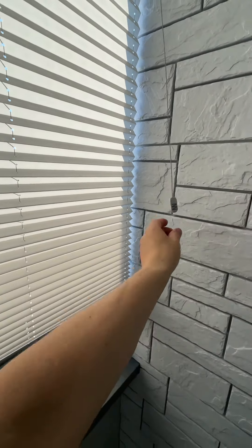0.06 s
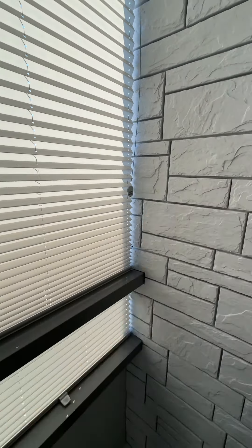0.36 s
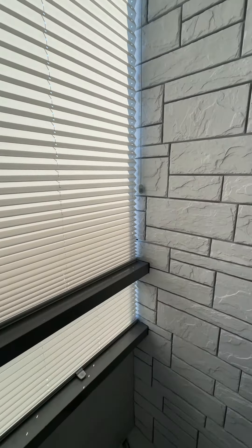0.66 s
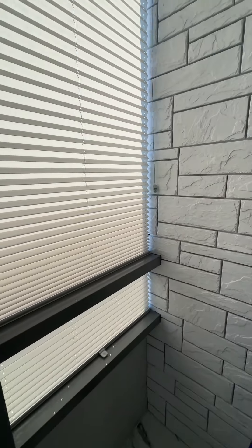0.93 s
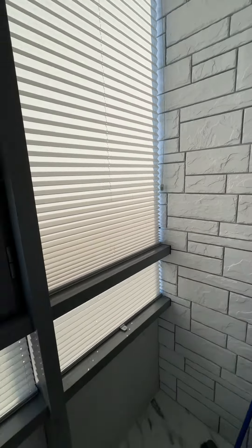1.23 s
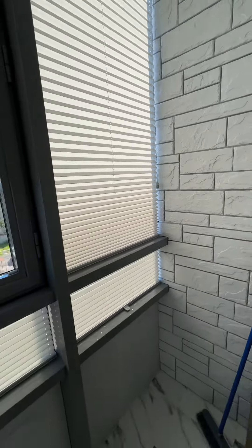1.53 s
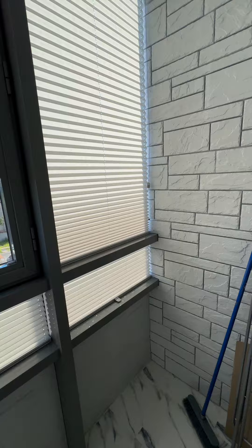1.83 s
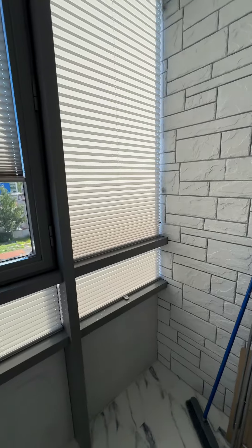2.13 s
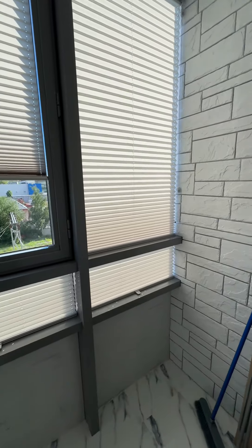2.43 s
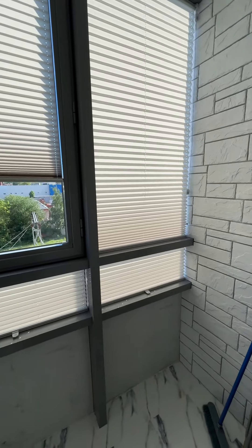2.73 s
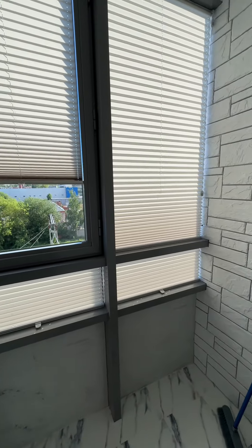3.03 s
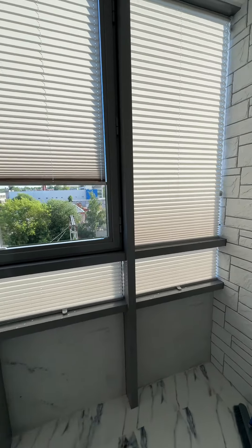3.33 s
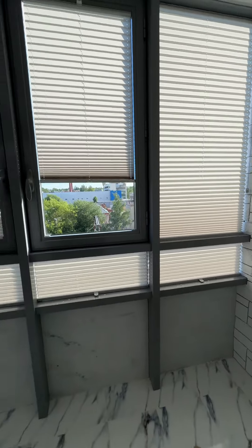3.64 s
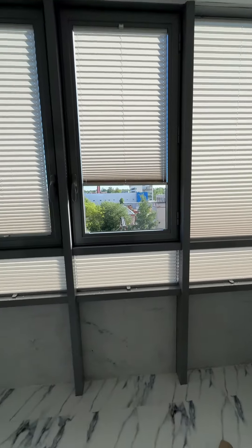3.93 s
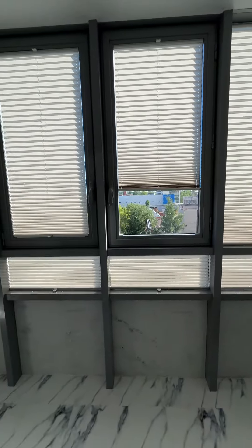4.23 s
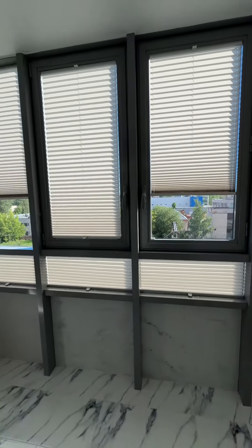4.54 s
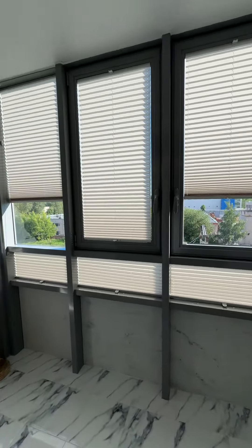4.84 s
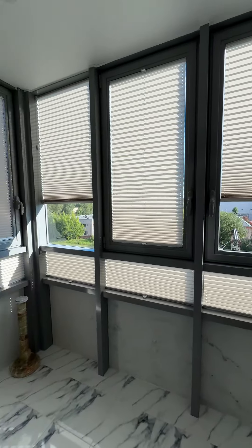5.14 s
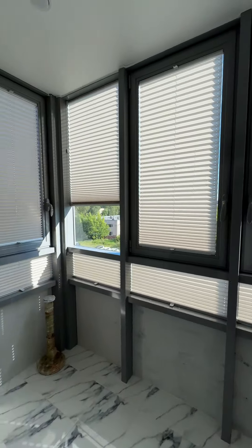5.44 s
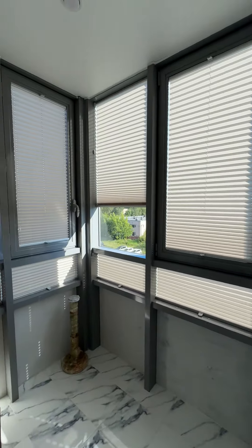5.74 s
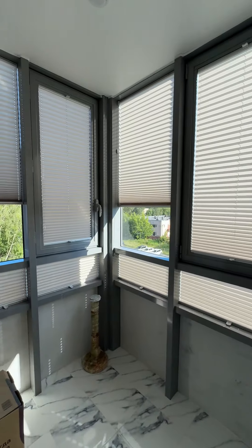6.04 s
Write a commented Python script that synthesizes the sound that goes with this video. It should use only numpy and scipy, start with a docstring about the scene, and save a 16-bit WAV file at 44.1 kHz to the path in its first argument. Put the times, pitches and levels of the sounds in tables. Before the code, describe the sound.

Someone moves around a narrow enclosed balcony, heard from close by over a faint low rumble from outside. After a brief rub and squeak, the handle of a window blind clacks against the wall with a quick bounce. Clothes rustle and feet shuffle in uneven bursts, mixed with blunt knocks and light ticks. A drawn-out rasping slide follows, then a short cluster of knocks, and the last rustles grow faint.

```python
"""Clothing rustles and feet shuffle on a small tiled balcony, while a low hum comes through the glass.
First comes a rub and a thin squeak, and at 0.4 s a handle taps the wall and bounces.
Short rushes of rubbing cloth follow, with small ticks, dull knocks and soft thuds as someone moves.
From 3.4 to 4.2 s there is one long, rasping slide. A few more knocks come near 4.7 s,
then the last rustles grow faint and the background sinks."""
import sys
import numpy as np
from scipy import signal
from scipy.fft import rfft, irfft, next_fast_len
from scipy.io import wavfile
from scipy.ndimage import uniform_filter1d

SR = 44100
rng = np.random.default_rng(int(sys.argv[2]) if len(sys.argv) > 2 else 0)


def pcm_store(signal):
    """Save signal as 16-bit PCM."""
    levels = np.round(np.clip(np.atleast_2d(signal), -1, 1) * 32767)
    wavfile.write(sys.argv[1], SR, levels.astype(np.int16).T)


N = 272962
TIME = np.arange(N) / SR
AGE = TIME[:SR // 2]   # seconds since one short sound began

# How long the balcony rings (a fade is the time to drop 60 dB): pitch_hz, fade_s
ROOM_FADES = [(125, 0.38), (500, 0.25), (2000, 0.26), (6000, 0.24), (14000, 0.23)]
# Standing waves between floor, ceiling and walls: pitch_hz, width_hz, boost_db
ROOM_RESONANCES = [(113, 14.7, 6), (124.6, 3.3, 5), (173.6, 11, -0.5), (211, 6.5, 2.5)]
# The slowly sinking background, before its offsets are added: time_s, hum_db, rumble_db
OUTSIDE_LEVELS = [(0.0, -64, -61.5), (2.9, -74, -58.5), (4.8, -76, -66), (5.4, -76, -69.5)]
# Tone of the distant rumble: pitch_hz, gain_db
RUMBLE_TONE = [(30, -37), (70, -8), (100, -3), (170, 0.5), (250, -9.5), (500, -14), (1000, -15),
               (2500, -19.5), (8000, -30)]
# Tone of the faint, steady air noise: pitch_hz, gain_db
AIR_TONE = [(40, -19), (90, 10.5), (150, 10), (300, 9.5), (500, 2), (900, -24), (1300, -2), (1700, 6.5),
            (2400, -24), (4000, -28), (8000, -28), (15500, -25)]

# Soft, heavy thuds: start_s, level_db, drag_s
THUD_EVENTS = [(0.01, -54.5, 0.04), (1.647, -43.5, 0.081), (1.704, -41, 0.034), (3.617, -38.5, 0.021),
               (3.647, -37.5, 0.031), (3.701, -45, 0.056), (4.811, -54.5, 0.053), (4.98, -53.5, 0.067),
               (6.06, -62.5, .05)]
# Tone of a thud: pitch_hz, gain_db
THUD_TONE = [(40, -68), (75, -6), (110, 0), (150, 3.5), (230, -1), (330, -6.5), (500, -24.5), (1200, -55),
             (4000, -66)]
# Small ticks and scrapes of someone moving: start_s, level_db, drag_s, tilt_db_per_octave
TICK_EVENTS = [(0.1428, -47.5, 0.0044, 9), (0.156, -44.5, .008, 13), (1.267, -44.5, 0.018, 8),
               (1.28, -39, 0.009, 4.5), (2.041, -47.5, 0.0046, 1.5), (2.152, -54, 0.0052, 5.5),
               (2.402, -55.5, 0.018, 6), (3.4252, -44.5, 0.0045, 1), (4.172, -39, 0.006, -1.5),
               (4.9107, -66, 0.012, 4.5), (5.7658, -63.5, 0.00091, -4)]
# Tone of a tick: pitch_hz, gain_db
TICK_TONE = [(50, -40), (150, 0), (400, 8), (1050, 8), (1700, 7), (3000, 3.5), (5000, 1), (8000, -5.5),
             (11000, -7.5), (16000, -16.5)]
# Dull knocks: start_s, level_db, muffle_hz, tilt_db_per_octave, room_db
KNOCK_EVENTS = [(0.7377, -37.5, 1070, 0.5, 5), (0.7464, -44.5, 620, 2, -2), (1.2681, -36, 1840, 2, 5),
                (1.285, -30, 1760, 1.5, -1), (1.29, -28, 1680, 1, 0), (1.308, -34, 900, -2.5, 1.5),
                (2.129, -51, 930, 3.5, 8), (2.4, -53, 900, -3, 5), (3.2141, -39, 990, -1, 4.5),
                (3.241, -47.5, 400, -16.5, -3), (4.668, -35.5, 1600, -0.5, -0.5),
                (4.687, -42.5, 1090, 5, 0), (4.7034, -34, 1510, 0, 2), (6.057, -56.5, 1250, 11, 7)]
# Tone of a knock: pitch_hz, gain_db
KNOCK_TONE = [(60, -26), (130, -5.5), (230, -1), (400, -4), (800, 0), (1100, -4), (2200, -6), (5000, -7.5),
              (16000, -13)]
# Where the knocked surface rings: pitch_hz, width_hz, boost_db
PANEL_RESONANCES = [(334, 38, 9), (465, 220, 10), (757, 110, 3), (1590, 220, 7.5)]
# A handle taps the wall and bounces: start_s, level_db, tilt_db_per_octave, room_db
TAP_EVENTS = [(0.4087, -31, -2, -3), (0.4119, -34, 1.5, 0.5), (0.441, -37, 5.5, 2.5), (0.449, -40.5, 2, 0),
              (0.455, -41.5, -4, 0)]
# Tone of a tap: pitch_hz, gain_db
TAP_TONE = [(60, -51), (300, -2), (700, -9), (1300, 0.5), (3000, -8.5), (6000, -11), (7000, -22),
            (9000, -23), (16000, -27)]
# Where the handle rings: pitch_hz, width_hz, boost_db
HANDLE_RESONANCES = [(448, 125, 20), (1345, 130, 6.5), (1650, 140, 7), (1800, 120, 5.5), (2180, 490, 18.5),
                     (3600, 440, -1), (5500, 900, 0.5), (7500, 450, 6)]
# Squeaks and rasps of things rubbing: peak_s, level_db, pitch_hz, width_hz, half_length_s
SQUEAK_EVENTS = [(0.01, -47, 8880, 300, 0.006), (0.046, -47, 8800, 248, 0.022),
                 (0.447, -43.5, 5630, 1110, 0.0077), (0.457, -47, 3600, 2180, .008),
                 (0.664, -62.5, 4050, 406, 0.0041), (0.683, -63, 4180, 403, 0.0035),
                 (1.636, -42.5, 2460, 1110, .004), (1.664, -43.5, 1264, 490, .02),
                 (1.768, -38.5, 1800, 1089, 0.021), (2.078, -52.5, 987, 602, 0.036),
                 (2.472, -44.5, 3310, 1805, 0.018), (2.597, -43.5, 2485, 1036, 0.0096),
                 (2.846, -43.5, 379.6, 216, .022), (3.002, -49.5, 1025, 90, .025),
                 (3.528, -49, 3005, 1503, 0.087), (3.8, -53, 6200, 1800, 0.053),
                 (3.906, -44.5, 450, 221, 0.038), (4.135, -40.5, 830, 88, 0.023),
                 (4.152, -41, 2458, 599, 0.048), (5.006, -52.5, 338, 158, 0.035),
                 (5.017, -67, 5400, 1800, 0.035), (5.28, -68, 1940, 804, 0.041)]

# The fabric's low part, its body: pitch_hz, gain_db
BODY_TONE = [(40, -49), (80, -22), (130, -28.5), (220, -1.5), (330, -1), (480, -5.5), (620, 2), (850, 1),
             (1100, -0.5), (1400, -5.5), (2400, -47)]
# The fabric's middle part, its rub: pitch_hz, gain_db
RUB_TONE = [(600, -26.5), (1000, -8), (1300, -2.5), (2200, 1.5), (2900, -3.5), (4000, -4), (5000, -11.5),
            (8000, -40)]
# The fabric's high part, its sheen: pitch_hz, gain_db
SHEEN_TONE = [(2500, -37), (4000, -6), (5000, 0.5), (7000, 0), (8500, -1.5), (10500, -2), (13000, -8),
              (16000, -10.5)]
# Where the rubbing cloth rings: pitch_hz, width_hz, boost_db
RUSTLE_RESONANCES = [(330, 9.8, 4.5), (485, 91, 7.5), (830, 320, -1), (1053, 75, 2), (1534, 160, 3.5),
                     (2230, 91, 2.5)]
# Short strokes of fabric: start_s, rise_s, hold_s, fade_s, base_db, body_offset_db, sheen_offset_db
STROKE_EVENTS = [ (0.0, 0.0063, 0.082, 0.4, -51, 0.5, -2.5), (0.253, 0.044, 0.0079, 1, -62, -19.5, 2.5),
                 (0.809, 0.015, .02, 0.69, -69.5, 1, 3), (0.876, 0.031, 0.018, 1, -59, 3.5, -3),
                 (1.134, 0.073, .012, 0.31, -48, -1, -1), (1.235, 0.039, 0.059, 0.4, -48.5, 3.5, -3.5),
                 (1.639, 0.013, 0.11, 0.4, -39.5, -3, -15), (1.676, 0.015, 0.02, 0.22, -45, -14, 0.5),
                 (1.927, 0.013, 0.46, 0.83, -73, 7, -3), (2.452, 0.0068, 0.11, 0.3, -53, -9.5, -1.5),
                 (2.585, 0.0073, 0.018, 0.4, -49, -2.5, 0.5), (2.734, 0.086, 0.028, 0.3, -44.5, -1, -5.5),
                 (2.916, 0.032, .02, 0.23, -54, -2.5, -7), (2.9746, 0.0038, 0.024, 0.33, -50, 1.5, -6.5),
                 (3.1466, 0.0044, 0.0096, 0.16, -63, -4, 0), (3.192, 0.0045, 0.072, 0.2, -54, 3.5, -4),
                 (3.3144, 0.011, 0.045, .3, -55.5, -6, -7.5), (3.3717, 0.007, 0.041, 0.15, -50, -3, -6),
                 (4.352, 0.012, 0.024, 0.66, -66.5, -2, 1), (4.497, 0.016, 0.025, 0.34, -70.5, 3, -12),
                 (4.653, 0.032, 0.028, 0.29, -61, -6, -3), (4.961, 0.018, 0.064, 0.22, -63, 4, -5),
                 (5.211, .04, 0.041, 0.28, -77, 6.5, -3), (5.489, 0.027, 0.16, .6, -86.5, 5, -0.5), ]
# The course of the one long slide: time_s, base_db, body_offset_db, sheen_offset_db
SLIDE_LEVELS = [(3.4, -41.5, -8.5, -13), (3.448, -44.5, -6, -9.5), (3.524, -44.5, -16, -16.5),
                (3.672, -44, 0.5, -6), (3.83, -41.5, -0.5, -8), (3.918, -40.5, 1, -10),
                (3.958, -43.5, -2.5, -11), (4.138, -42.5, -1, -9), (4.18, -38.5, -5.5, -10),
                (4.185, -43, 0.5, -10.5)]


def from_db(db):
    """Turn decibels into a number to multiply by."""
    return 10 ** (np.asarray(db) / 20)


def unit_power(x):
    """Scale a signal so that its average power is 1."""
    return x / np.sqrt(np.mean(x ** 2) + 1e-20)


def at_level(x, db):
    """Scale a short sound so that its loudest 8 ms have this level."""
    return x * from_db(db) / np.sqrt(uniform_filter1d(x ** 2, size=SR // 125).max())


def add(out, start_s, sound):
    """Mix a sound into the scene at its start time."""
    i = max(round(start_s * SR), 0)
    out[i:i + len(sound)] += sound[:N - i]


def at_hz(table, hz):
    """Read between the rows of a table, on a musical (log) pitch scale."""
    pitches, values = np.transpose(table)
    return np.interp(np.log(hz + 1), np.log(pitches), values)


def peaks(resonances, hz):
    """The boost in dB near the pitches where something rings."""
    return sum(db / (1 + (2 * (hz - pitch) / width) ** 2) for pitch, width, db in resonances)


def tilt(hz, db_per_octave):
    """A slope in dB that pivots at 2 kHz: upward is brighter, downward is duller."""
    return db_per_octave * np.log2(np.maximum(hz, 100) / 2000)


def shape_tone(x, db_at):
    """Filter x by db_at(hz) decibels, ringing only after each sound (minimum phase)."""
    size = 2 * next_fast_len(len(x) // 2 + 2048)
    log_gain = np.log(from_db(db_at(abs(np.fft.fftfreq(size, 1 / SR)))))
    response = np.exp(np.conj(signal.hilbert(log_gain)))[:size // 2 + 1]
    return irfft(rfft(x, size) * response, size)[:len(x)]


def drift(turns_per_s, size):
    """A random wandering curve, with a typical size of 1."""
    position = np.arange(size) / SR * turns_per_s
    points = rng.standard_normal(int(position[-1]) + 2)
    return unit_power(np.interp(position, np.arange(len(points)), points))


def wavering_tone(hz, width_hz, size=N):
    """A tone whose strength and pitch wander; a wider one sounds rougher."""
    wander = drift(width_hz, size) + 1j * drift(width_hz, size)
    return unit_power(np.real(wander * np.exp(2j * np.pi * hz * TIME[:size])))


def slips(drag_s, first_slip=11.0):
    """Two things touch: one hard slip, then a dying shower of smaller ones."""
    shower = rng.standard_normal(len(AGE)) * rng.exponential(1, len(AGE))
    return shower * np.exp(-AGE / drag_s) + first_slip * (AGE == 0)


def balcony(x, room_db, build_s=0.0012, early_boost=0.72, early_s=0.0085):
    """Add strong early echoes off glass and tile, then a fading tail; new for every position."""
    spectrum = rfft(rng.standard_normal(len(AGE)))
    hz = np.fft.rfftfreq(len(AGE), 1 / SR)
    pitches, fades = np.transpose(ROOM_FADES)
    tail = 0
    for fade_s, share in zip(fades, np.eye(len(fades))):
        band = at_hz(np.c_[pitches, share], hz)
        tail = tail + irfft(spectrum * band, len(AGE)) * from_db(-60 * AGE / fade_s)
    tail *= 1 - np.exp(-(AGE / build_s) ** 2)
    tail *= 1 + early_boost * np.exp(-AGE / early_s)
    echoes = signal.fftconvolve(x, tail / np.linalg.norm(tail))[:len(x)]
    return x + from_db(room_db) * echoes


def room_noise(tone):
    """Steady noise, boosted by the balcony's standing waves."""
    noise = rng.standard_normal(N)
    return unit_power(shape_tone(noise, lambda hz: at_hz(tone, hz) + peaks(ROOM_RESONANCES, hz)))


def background(hum_offset_db=3.5, rumble_offset_db=-3.0, air_db=-74):
    """A wavering hum and distant rumble behind the glass, with faint air noise."""
    times, hum_db, rumble_db = np.transpose(OUTSIDE_LEVELS)
    hum = from_db(np.interp(TIME, times, hum_db) + hum_offset_db) * wavering_tone(hz=59.2, width_hz=14)
    rumble = from_db(np.interp(TIME, times, rumble_db) + rumble_offset_db) * room_noise(RUMBLE_TONE)
    return hum + rumble + from_db(air_db) * room_noise(AIR_TONE)


def thuds():
    """Slow, heavy bumps boom in the narrow room."""
    out = np.zeros(N)
    for start_s, db, drag_s in THUD_EVENTS:
        boom = shape_tone(slips(drag_s), lambda hz: at_hz(THUD_TONE, hz) + peaks(ROOM_RESONANCES, hz))
        add(out, start_s, at_level(balcony(boom, room_db=-2), db))
    return out


def small_ticks():
    """Someone moving makes small, bright ticks; some drag out into a short scrape."""
    out = np.zeros(N)
    for start_s, db, drag_s, slope in TICK_EVENTS:
        tick = shape_tone(slips(drag_s), lambda hz: at_hz(TICK_TONE, hz) + tilt(hz, slope))
        add(out, start_s, at_level(balcony(tick, room_db=4), db))
    return out


def knocks(leak_db=-31):
    """Blunt blows: the softer the contact, the more of the treble is muffled."""
    out = np.zeros(N)
    for start_s, db, muffle_hz, slope, room_db in KNOCK_EVENTS:
        def tone_db(hz):
            surface = at_hz(KNOCK_TONE, hz) + peaks(PANEL_RESONANCES, hz)
            muffling = 10 * np.log10(1 / (1 + (hz / muffle_hz) ** 8) + from_db(leak_db) ** 2)
            return surface + muffling + tilt(np.minimum(hz, muffle_hz), slope)
        blow = shape_tone(1.0 * (AGE == 0), tone_db)   # a single click, shaped into a knock
        add(out, start_s, at_level(balcony(blow, room_db), db))
    return out


def handle_taps():
    """Each tap on the wall briefly rings the handle at the same pitches; glancing ones are brighter."""
    out = np.zeros(N)
    for start_s, db, slope, room_db in TAP_EVENTS:
        def tone_db(hz):
            return at_hz(TAP_TONE, hz) + peaks(HANDLE_RESONANCES, hz) + tilt(np.minimum(hz, 6000), slope)
        clack = shape_tone(1.0 * (AGE == 0), tone_db)
        add(out, start_s, at_level(balcony(clack, room_db), db))
    return out


def squeaks():
    """Something rubbing sings at one pitch, swells and lets go."""
    out = np.zeros(N)
    for peak_s, db, hz, width_hz, half_s in SQUEAK_EVENTS:
        swell = np.exp(-(AGE / half_s - 2) ** 2)
        squeak = swell * wavering_tone(hz, width_hz, len(AGE))
        add(out, peak_s - 2 * half_s, at_level(balcony(squeak, room_db=-8), db))
    return out


def friction(size, rough_db=1.5, judder_db=0.4, snags_per_s=90, snag_db=14):
    """Countless fibres slip in uneven clumps as cloth rubs and shuffles; now and then one snags."""
    hiss = rng.standard_normal(size)
    hiss *= from_db(rough_db * drift(400, size) + judder_db * drift(68.9, size))
    snags = (rng.random(size) < snags_per_s / SR) * rng.standard_normal(size) * from_db(snag_db)
    rubbing = balcony(unit_power(hiss) + snags, room_db=-4)
    return shape_tone(rubbing, lambda hz: peaks(RUSTLE_RESONANCES, hz))


def wandering_friction(size, places, shifts_per_s=9):
    """The rubbing wanders among a number of places, each with its own echoes."""
    shares = np.array([abs(drift(shifts_per_s, size)) + 1e-6 for _ in range(places)])
    return sum(share * friction(size) for share in shares / np.linalg.norm(shares, axis=0))


def fabric_rush(t, rise_s, hold_s, fade_s, base_db, body_offset_db, sheen_offset_db, places=1):
    """Fabric speeds up, keeps going and dies away; pressure brings out the body and speed the sheen."""
    parts = ((BODY_TONE, body_offset_db, 1.12 * fade_s),
             (RUB_TONE, -0.44, fade_s),
             (SHEEN_TONE, sheen_offset_db, 1.06 * fade_s))
    rise = np.clip(t / rise_s, 0, 1)
    since_hold_s = np.maximum(t - rise_s - hold_s, 0)
    out = 0
    for tone, offset_db, part_fade_s in parts:
        rubbing = unit_power(shape_tone(wandering_friction(len(t), places), lambda hz: at_hz(tone, hz)))
        fade = from_db(-60 * since_hold_s / part_fade_s)
        out = out + rubbing * rise * fade * from_db(base_db + offset_db)
    return out


def short_strokes(catch_db=9.5, catch_loss_db_per_s=520):
    """Each stroke breaks free with a tick; the more sudden the start, the harder the fabric catches."""
    out = np.zeros(N)
    for start_s, rise_s, hold_s, fade_s, base_db, *offsets_db in STROKE_EVENTS:
        add(out, start_s, fabric_rush(TIME[:SR], rise_s, hold_s, fade_s, base_db, *offsets_db))
        tick = shape_tone(slips(drag_s=0.0062), lambda hz: at_hz(TICK_TONE, hz))
        tick_db = base_db + catch_db - catch_loss_db_per_s * rise_s
        add(out, start_s, at_level(balcony(tick, room_db=5.5), tick_db))
    return out


def long_slide(rise_s=0.01, fade_s=0.28, surge_db=1.4, surges_per_s=30):
    """One drawn-out rush that starts light, then bears down in uneven surges."""
    out, t = np.zeros(N), TIME[:SR + SR // 2]
    times, *levels = np.transpose(SLIDE_LEVELS)
    base_db, *offsets_db = (np.interp(times[0] + t, times, db) for db in levels)
    base_db += surge_db * drift(surges_per_s, len(t))
    hold_s = times[-1] - times[0] - rise_s
    add(out, times[0], fabric_rush(t, rise_s, hold_s, fade_s, base_db, *offsets_db, places=4))
    return out


def scene():
    """All the sounds together, in one channel."""
    rustle_and_taps = short_strokes() + long_slide() + squeaks() + handle_taps()
    return (rustle_and_taps + knocks() + small_ticks() + thuds() + background())[None]


def record(dry, low_cut_hz=42, high_cut_hz=15850):
    """Cut away the deepest bass and the highest treble."""
    bass_cut = signal.butter(4, low_cut_hz, "high", fs=SR, output="sos")
    treble_cut = signal.ellip(12, .1, 70, high_cut_hz, fs=SR, output="sos")
    return signal.sosfilt(treble_cut, signal.sosfilt(bass_cut, dry))


dry = scene()
out = record(dry)
pcm_store(out)
```